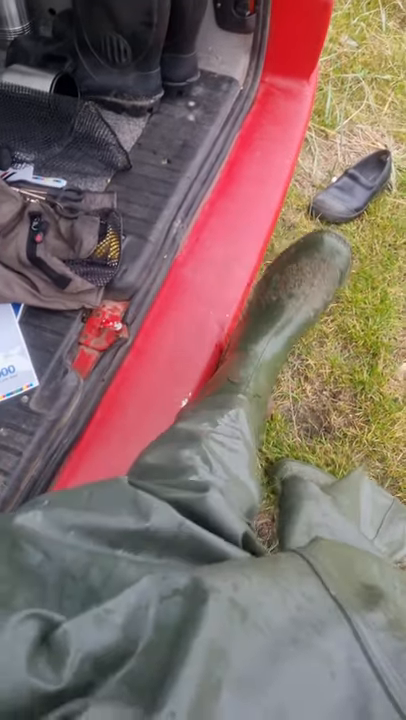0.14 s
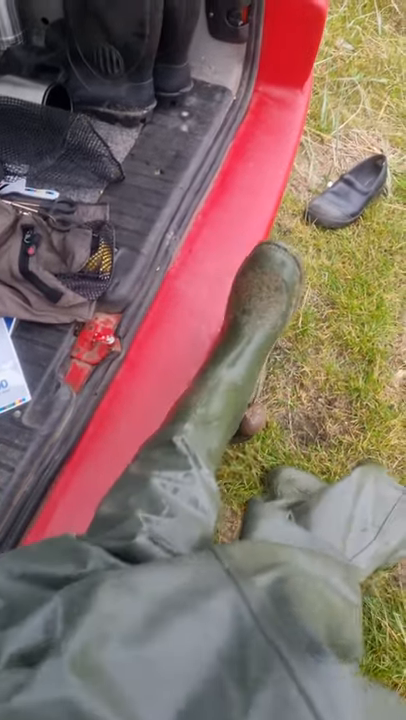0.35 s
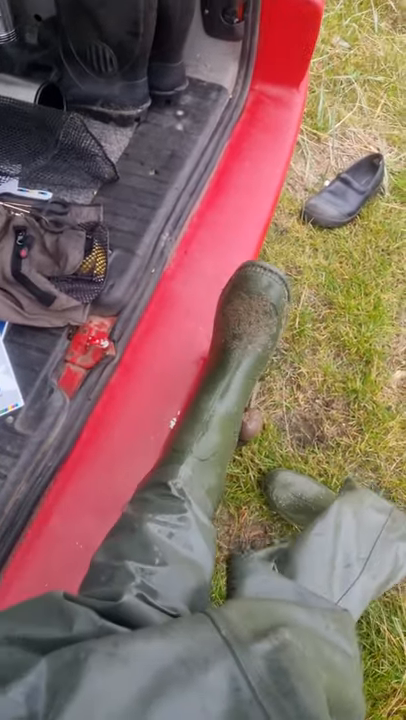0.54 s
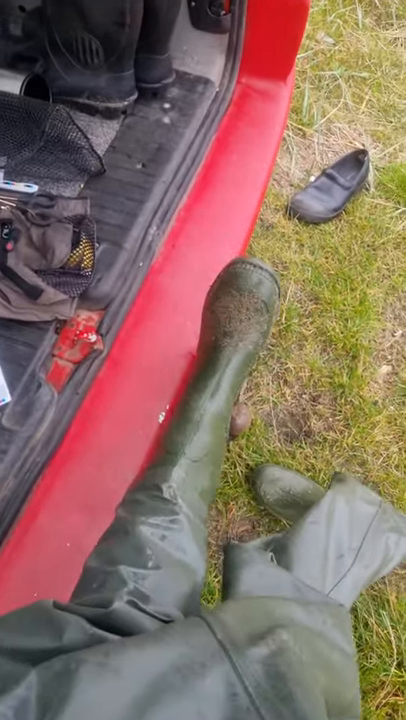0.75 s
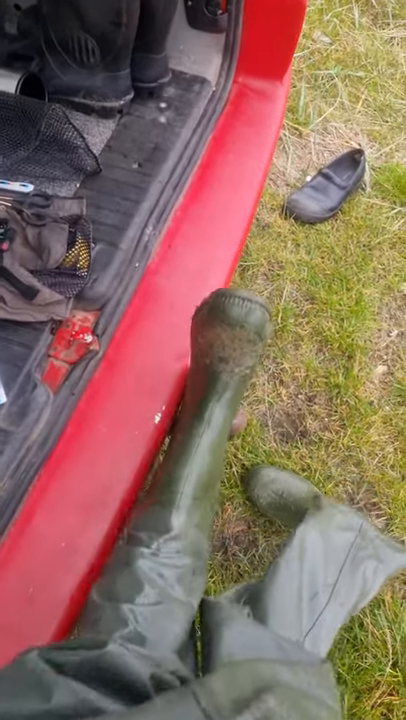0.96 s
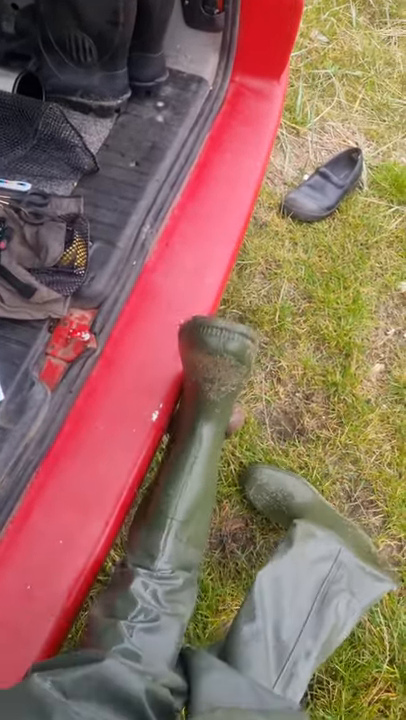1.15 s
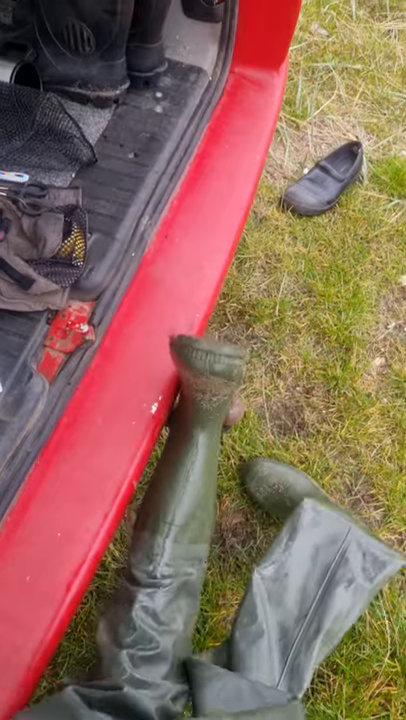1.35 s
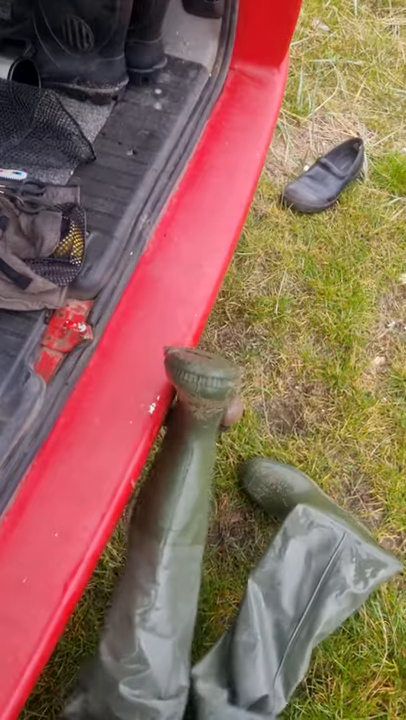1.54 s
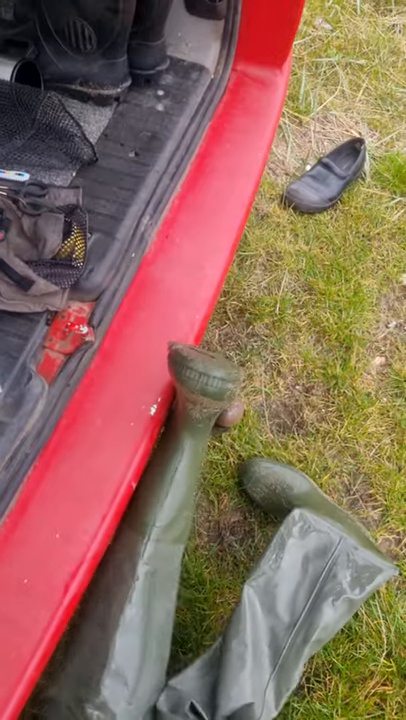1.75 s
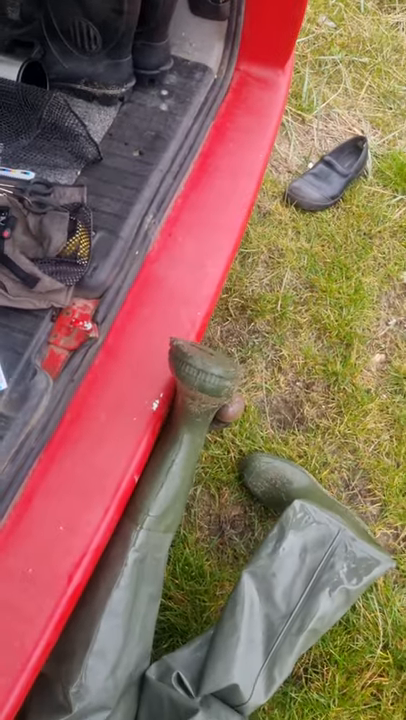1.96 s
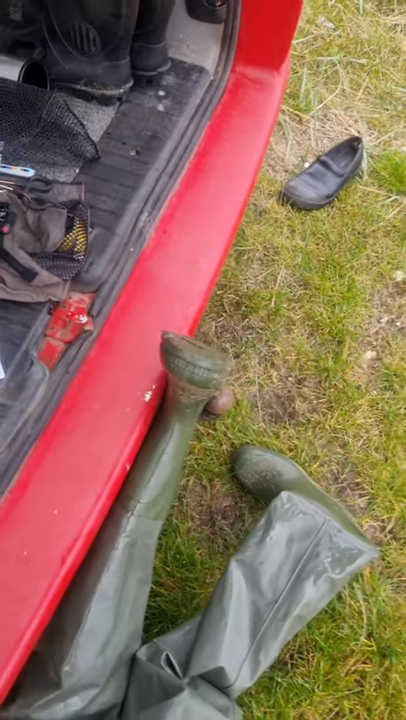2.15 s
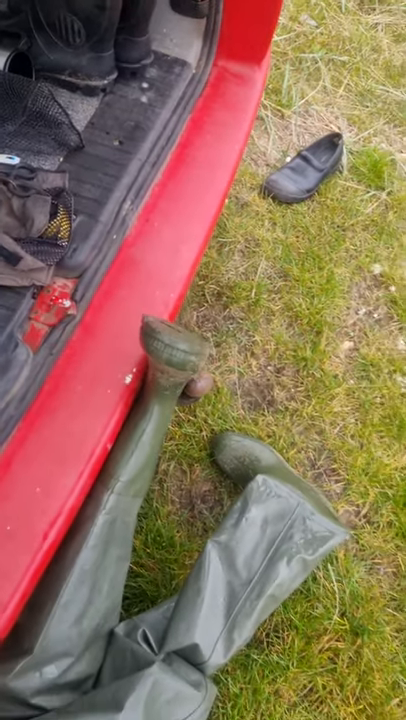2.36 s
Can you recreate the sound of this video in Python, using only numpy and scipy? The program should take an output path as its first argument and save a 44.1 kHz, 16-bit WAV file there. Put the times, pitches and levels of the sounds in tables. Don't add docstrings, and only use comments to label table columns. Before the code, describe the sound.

Close, grainy rubber rubbing on a hollow metal panel: a double drag, a swelling scrape, a hard stuttering press and a light final scuff, with low grip bumps on a handheld microphone outdoors.

```python
import sys
import numpy as np
from scipy import signal
from scipy.fft import rfft, irfft, next_fast_len
from scipy.io import wavfile
from scipy.ndimage import uniform_filter1d, map_coordinates

SR = 44100
rng = np.random.default_rng(int(sys.argv[2]) if len(sys.argv) > 2 else 0)


def field_ratio(decibels):
    return 10 ** (np.asarray(decibels, dtype=float) / 20)


def bounce(signal):
    frames = np.transpose(np.atleast_2d(signal))
    limited = np.clip(frames, -1, 1)
    pcm = np.round(limited * 32767).astype(np.int16)
    wavfile.write(sys.argv[1], SR, pcm)


N = 110250
SIDES = np.array([[1], [-1]])


def unit(x):
    return x / np.sqrt(np.mean(x ** 2) + 1e-20)


def colour(points):
    f, v = np.transpose(points)
    return lambda hz: field_ratio(np.interp(np.log(hz + 1), np.log(f + 1), v, left=-90, right=-90))


def curves(rows):
    fade_s = 0.067
    s, *cols = np.transpose(rows)
    t = np.arange(N) / SR
    outside_s = np.abs(t - np.clip(t, s[0], s[-1]))
    fade_db = -20 * (outside_s / fade_s) ** 2
    return [np.interp(t, s, c) + fade_db for c in cols]


def wobble(rate):
    return map_coordinates(rng.standard_normal(2000), [np.arange(N) * rate / SR])


def filtered(x, response):
    m = next_fast_len(N + SR // 2)
    return irfft(rfft(x, m) * response(np.fft.rfftfreq(m, 1 / SR)), m)[..., :N]


def resonances(peaks):
    def response(f):
        total = 0
        for k, (centre, width, db) in enumerate(peaks):
            damping = 1j * f * width
            total = total + (-1) ** k * field_ratio(db) * damping / (centre ** 2 - f * f + damping)
        return total
    return response


def grains(rate, scatter_db):
    hit = rng.random((3, N)) < rate / SR
    sign = np.sign(rng.standard_normal((3, N)))
    return unit(hit * sign * field_ratio(scatter_db * rng.exponential(1, (3, N))))


def patchy(depth_db, size=256):
    z = signal.stft(rng.standard_normal((3, N)), nperseg=size)[2]
    field = uniform_filter1d(rng.standard_normal(z.shape[1:]), size=3, axis=0)
    field = uniform_filter1d(field, size=5, axis=1)
    return unit(signal.istft(z * field_ratio(depth_db * unit(field)), nperseg=size)[1][:, :N])


def placed(three, lag_ms, alike, pan_db):
    share = lambda hz: np.clip(alike, 0, 1) / (1 + (hz / 2140) ** 2)
    delay = lambda hz: np.exp(-1j * np.pi * hz * SIDES * lag_ms / 1000)
    shared = filtered(three[0], lambda hz: np.sqrt(share(hz)) * delay(hz))
    own = filtered(three[1:], lambda hz: np.sqrt(1 - share(hz)))
    return (shared + own) * field_ratio(SIDES * pan_db / 2)


# (time [s], sliding speed [dB], pressure [dB])
STROKES = [
    [(.02, -84, -60), (.19, -52.5, -49.5), (.3, -43, -43.5), (.352, -44.5, -41), (.368, -56, -38.5),
     (.434, -57, -48.5), (.48, -41, -39.5), (.585, -57, -50.5), (.615, -80, -65)],
    [(.735, -95, -65), (.745, -78, -54), (.81, -71, -56), (.89, -61, -53), (.95, -52, -47.5),
     (1.06, -42.5, -46), (1.14, -45.5, -46), (1.18, -48.5, -43.5), (1.3, -48.5, -49.5)],
    [(1.33, -45.5, -44.5), (1.424, -41, -43.5), (1.58, -42.5, -35.5), (1.665, -42.5, -45.5),
     (1.71, -47, -50.5), (1.82, -48.5, -48.5), (1.89, -62.5, -58), (1.965, -62.5, -61), (1.99, -77.5, -68)],
    [(2.08, -72, -63), (2.11, -66, -68), (2.165, -57, -56.5), (2.19, -61, -62), (2.21, -59, -59.5),
     (2.235, -55, -58), (2.3, -58.5, -61), (2.39, -64.5, -65), (2.5, -66, -69)],
]
SHEEN_HZ = [300, 480, 900, 2000, 3000, 5000, 7200, 16000]
# (level [dB per Hz], ..)
SHEEN = [
    [-60, 3.5, 0, -6.5, -3.5, -5, -4.5, -16.5],
    [-85, 4, 0, 1.5, -2, -6, -11.5, -24.5],
    [-51, -4, 4.5, -1, -2, -4, -10, -17.5],
    [-24, 0.7, -7, -10, -17, -21.5, -30.5, -46],
]
# (left lag [ms], left-right likeness [0-1], left over right [dB])
PLACES = [(-.55, .75, 3.5), (-.1, .85, 2), (.38, .9, 0), (.2, .8, -1.5)]
# (frequency [Hz], width [Hz], level [dB])
SILL = [(136, 42, -18), (229, 70, -7), (276, 52.5, -2.5), (367.8, 33.2, -1.5), (534.4, 9.7, -7.5),
        (795, 71, -10), (1010, 39, -59), (1330, 520, -24), (1950, 140, -10)]


def rubbing():
    slip_s, ring_in_hiss_db = 0.00095, -20.5
    out, sill = np.zeros((2, N)), resonances(SILL)

    def soft_sill(hz):
        softened = sill(hz) / (1 + 2j * np.pi * hz * slip_s)
        return softened * hz ** 2 / (hz ** 2 + 110 ** 2)

    for rows, sheen, (lag_ms, alike, pan_db) in zip(STROKES, SHEEN, PLACES):
        speed_db, press_db = curves(rows)
        grit = patchy(2.5, size=768) + field_ratio(-15.5) * grains(1900, 4)
        surface = colour(list(zip(SHEEN_HZ, sheen)))
        hiss = unit(filtered(grit, lambda hz: surface(hz) * (1 + field_ratio(ring_in_hiss_db) * sill(hz))))
        out += placed(hiss * field_ratio(speed_db + 0.5 + 1.46 * wobble(39.93)), lag_ms, alike, pan_db)
        slips = grains(200, 2.5) + 0.97 * rng.standard_normal((3, N))
        rung = filtered(slips * field_ratio(press_db + 29.0), soft_sill)
        out += placed(rung, lag_ms, 0.97, pan_db)
    return out


# (time [s], peak level [dB])
JUDDERS = [(.356, -39), (.494, -33.5), (.744, -37.5), (.867, -46.5), (.92, -38), (0.937, -36.5),
           (.979, -40.5), (1.001, -34.5), (1.043, -30), (1.373, -33), (1.465, -32.5), (1.487, -31),
           (1.516, -26), (1.536, -24.5), (1.557, -27), (1.583, -31), (1.692, -36.5), (1.785, -42),
           (1.855, -40.5)]


def judders():
    push, slips = np.zeros(N), np.zeros(N)
    push[:48] = np.hanning(48)
    upper = resonances(SILL[2:])
    ring = filtered(push, lambda hz: upper(hz) * (1j * hz / (330 + 1j * hz)) ** 2)[:SR // 4]
    for s, db in JUDDERS:
        slips[round(s * SR)] = field_ratio(db)
    rung = signal.fftconvolve(slips, ring / np.abs(ring).max())[:N]
    return placed(np.array([rung, rung, -rung]), 0.52, 1.0, 0.87)


# (time [s], length [s], frequency [Hz], width [Hz], level [dB])
SCUFFS = [(0.033, 0.024, 800, 1300, -55.5), (0.097, 0.37, 158, 120, -54.5), (1.89, 0.16, 190, 85, -49),
          (2.287, 0.27, 480, 60, -63), (0.741, .012, 4160, 900, -60), (1.777, 0.025, 4100, 530, -53),
          (1.7, .02, 1750, 400, -52), (1.2, 0.072, 800, 210, -54), (1.947, 0.026, 2370, 430, -59.5),
          (1.8, 0.054, 1740, 230, -56), (2.1, .03, 1000, 900, -57), (2.16, 0.017, 450, 350, -74),
          (2.169, 0.045, 1700, 1160, -51), (2.221, 0.056, 930, 570, -55), (2.255, 0.026, 1100, 1400, -55)]


def scuffs():
    out, t = np.zeros((3, N)), np.arange(N) / SR
    grit = rng.standard_normal(N)
    for s, length, hz, width_hz, db in SCUFFS:
        u = np.clip((t - s) / length, 0, 1)
        swell = (1 - np.exp(-12 * u)) * (1 - u ** 2)
        band = unit(filtered(grit, lambda f: resonances([(hz, width_hz, 0)])(f) ** 2))
        unrelated = np.array([np.roll(band, k * N // 3) for k in range(3)])
        out += field_ratio(db) * swell * unrelated
    return placed(out, 0.31, 0.58, -1)


# (time [s], peak level [dB])
KNOCKS = [
    (1.046, -43),
    (1.778, -38),
    (2.216, -44),
]
# (frequency [Hz], level [dB], 60 dB decay [s])
KNOCK_MODES = [(610, -4, 0.03), (800, 4, 0.035), (1036, 1, 0.03), (1350, -5, .025)]


def knocks():
    out, t = np.zeros((2, N + SR)), np.arange(SR // 8) / SR
    muffled = lambda hz: resonances([(950, 800, 0)])(hz) ** 2
    crack = unit(filtered(rng.standard_normal((2, N)), muffled))
    onset = 1 - np.exp(-t / 0.0016)
    for s, db in KNOCKS:
        start = round(s * SR)
        ring = field_ratio(-2 - 60 * t / 0.05) * crack[:, start:][:, :len(t)]
        for hz, level_db, t60_s in KNOCK_MODES:
            decay = field_ratio(level_db + rng.normal(0, 0.36, (2, 1)) - 60 * t / t60_s)
            ring = ring + decay * np.sin(2 * np.pi * hz * t + rng.normal(0, 0.3, (2, 1)))
        out[:, start:][:, :len(t)] += field_ratio(db + 1) * ring * onset
    return out[:, :N]


# (time [s], peak level [dB])
TICKS = [(0.035, -61.5), (.1, -59), (.18, -59), (.41, -62), (0.5824, -42.5), (0.7407, -52), (.759, -60),
         (.776, -61), (0.791, -54), (0.816, -53), (0.833, -51.5), (.848, -61), (0.9123, -48), (1.412, -36),
         (1.495, -37), (1.595, -39), (1.868, -50), (1.9555, -76), (2.2588, -69)]


def ticks():
    t60_s, rise_s = 0.048, 0.005
    t = np.arange(N) / SR
    shape = np.zeros(N)
    for s, db in TICKS:
        age = np.maximum(t - s, 0)
        shape += field_ratio(db - 60 * age / t60_s) * (1 - np.exp(-age / rise_s))
    return shape * unit(filtered(patchy(1.5)[:2], resonances([(7800, 6600, 0)])))


# (time [s], length [s], first pitch [Hz], last pitch [Hz], level [dB])
SQUEAKS = [
    (.311, .013, 2950, 3050, -45),
    (1.785, .036, 2950, 3500, -50),
    (2.105, .075, 2000, 2050, -64),
]


def squeaks():
    out, t = np.zeros((3, N)), np.arange(N) / SR
    for s, length, first_hz, last_hz, db in SQUEAKS:
        u = np.clip((t - s) / length, 0, 1)
        hz = (first_hz + (last_hz - first_hz) * u) * (1 + 0.03 * wobble(200))
        grain = 1.03 + np.array([wobble(500) for port in range(3)])
        swell = np.sqrt(np.sin(np.pi * u).clip(0))
        out += field_ratio(db) * grain * swell * np.sin(2 * np.pi * np.cumsum(hz) / SR)
    return placed(out, 0.076, 0.71, 1.6)


# (time [s], level [dB])
HANDLING = [(0, -63), (.1, -57), (.18, -50), (.3, -51.5), (.44, -48.5), (.6, -41.5), (.7, -52), (.78, -46),
            (.88, -51.5), (1.02, -47.5), (1.28, -46), (1.5, -36), (1.72, -47.5), (1.86, -45.5), (2.1, -46),
            (2.25, -47.5), (2.379, -61.5)]
# (frequency [Hz], level [dB per Hz])
RUMBLE = [(13, -43), (22, -5), (54, 8), (80, 4), (130, -9.5), (260, -36), (500, -96)]
# (middle time [s], length [s], frequency [Hz], peak level [dB])
JOLTS = [(0.149, .04, 114, -47.5), (0.199, .05, 129, -41), (.34, .04, 116, -36), (0.362, 0.07, 58.3, -27),
         (0.397, 0.05, 57, -34), (0.423, 0.023, 63.5, -35), (0.469, 0.05, 81, -34),
         (0.518, 0.07, 133.5, -30.5), (0.524, 0.06, 61.6, -29.5), (0.574, 0.08, 52, -26.5),
         (0.64, 0.05, 50, -36.5), (0.775, .03, 67.6, -38.5), (0.792, 0.03, 74.4, -35),
         (1.16, 0.014, 71.4, -35), (1.19, 0.046, 57.6, -32.5), (1.225, 0.025, 62, -30.5),
         (1.341, 0.043, 68.6, -30), (1.376, 0.04, 75.5, -26), (1.431, 0.052, 64.5, -26),
         (1.468, 0.043, 75, -24.5), (1.523, 0.03, 79, -27), (1.561, 0.084, 67, -34.5),
         (1.625, 0.056, 70, -28.5), (1.671, 0.045, 65, -24.5), (1.911, 0.026, 117, -28.5),
         (1.935, 0.03, 71, -24.5), (1.965, 0.026, 92, -28), (1.99, .03, 101, -27.5),
         (2.012, 0.05, 72, -23.5), (2.043, 0.03, 84, -28.5), (2.165, 0.021, 53.7, -29.5)]


def handling():
    shake_db, = curves(HANDLING + [(2.5, HANDLING[-1][1])])
    low = unit(filtered(rng.standard_normal((3, N)), colour(RUMBLE)))
    out = placed(low * field_ratio(shake_db + 2.5 + 1.2 * wobble(7.0)), 0, 0.3, 2.5)
    creaky = lambda hz: resonances([(152, 110, 0)])(hz) ** 3
    creak = unit(filtered(rng.standard_normal((2, N)), creaky))
    t = np.arange(-SR // 10, SR // 10) / SR
    for s, length, hz, db in JOLTS:
        swell = np.cos(np.pi * np.clip(t / (0.89 * max(length, 0.032)), -.5, .5)) ** 2
        chance = rng.standard_normal((3, 2, 1))
        phase = 2 * np.pi * (hz * t + chance[0, 0]) + 0.7 * np.sign(chance[1, 0]) * SIDES
        level = field_ratio(db + 0.5 * chance[2] + SIDES)
        span = round(s * SR) + np.arange(len(t)) - len(t) // 2
        out[:, span] += level * swell * (np.sin(phase) + field_ratio(-24) * creak[:, span])
    return out


# (frequency [Hz], level [dB per Hz])
AIR = [(150, -45), (250, -37), (450, -5.5), (1830, -15), (8410, -30), (15700, -41)]


def air():
    return field_ratio(-72) * unit(filtered(rng.standard_normal((2, N)), colour(AIR)))


def scene():
    contact = rubbing() + judders() + scuffs() + knocks() + ticks() + squeaks()
    return contact + handling() + air()


def roll_off(x):
    return signal.sosfilt(signal.butter(12, 15830, fs=SR, output="sos"), x)


# (frequency [Hz], level [dB])
PORTS = [(20, 0.5), (2050, 1.5), (2400, -0.5), (7800, 0.5), (8400, -2), (10400, 1.5), (11500, -2),
         (12800, 4.5), (16500, 1.5)]
# (frequency [Hz], level [dB])
LEAN = [(20, -1), (700, 2.5), (1300, -4), (2600, 1.5), (8000, 3), (16500, 2)]


def record(dry):
    def ports(hz):
        lean = colour(LEAN)(hz) ** (SIDES / 2)
        return colour(PORTS)(hz) * lean * (hz < 15800)

    mix = filtered(dry, ports)
    return roll_off(mix)


dry = scene()
out = record(dry)
bounce(out)
```